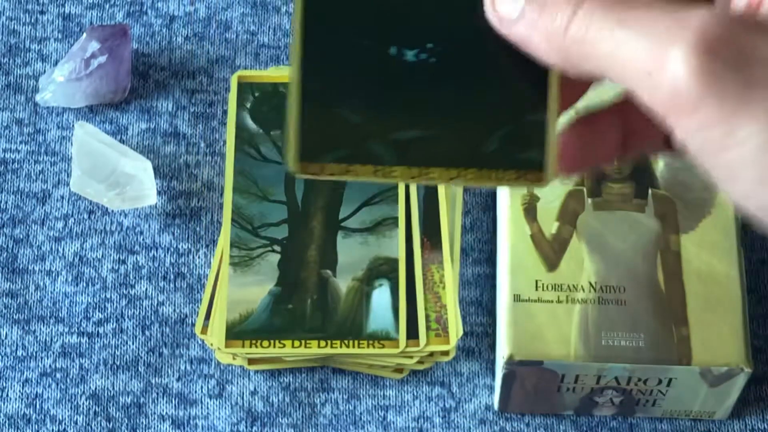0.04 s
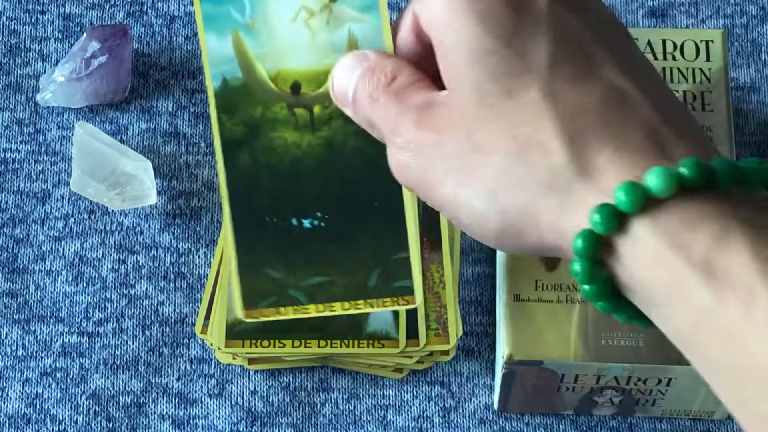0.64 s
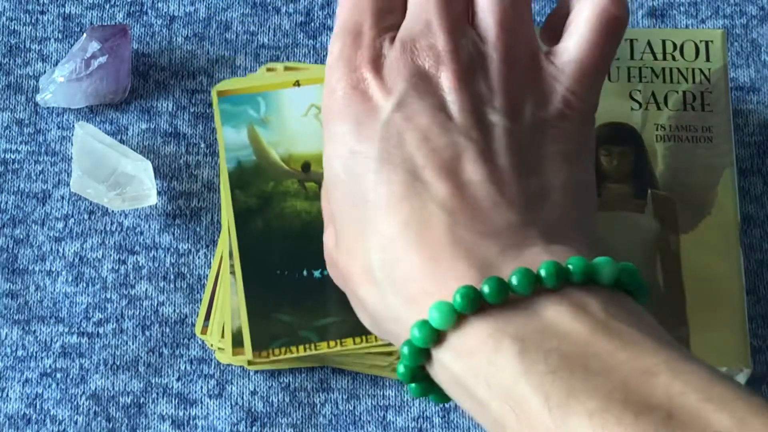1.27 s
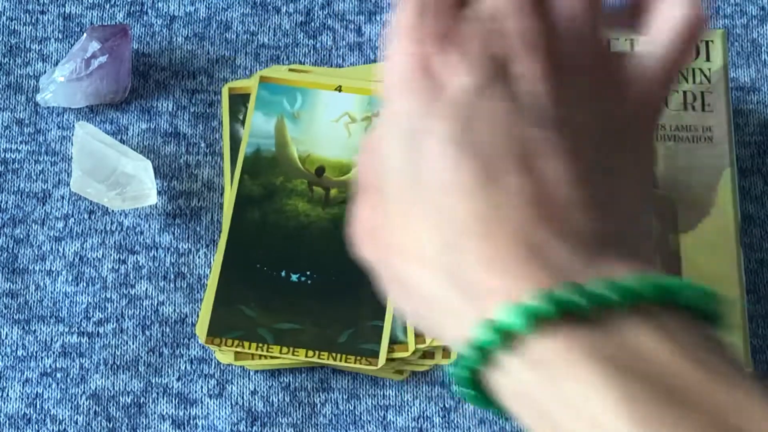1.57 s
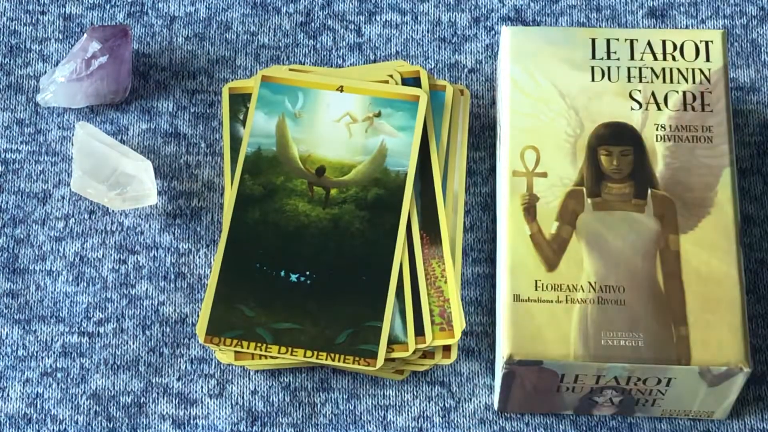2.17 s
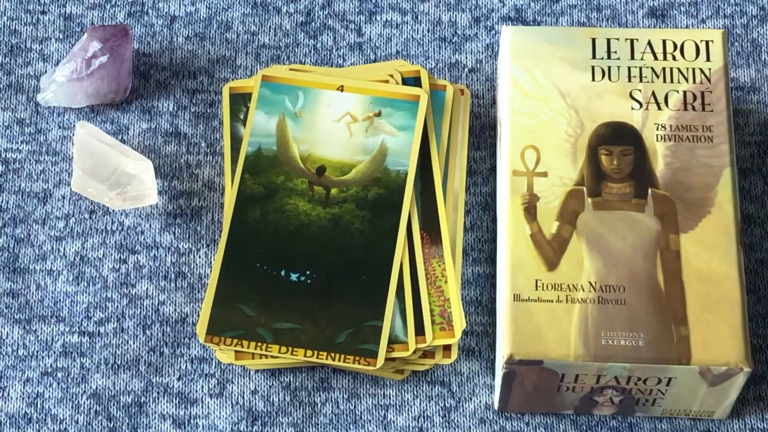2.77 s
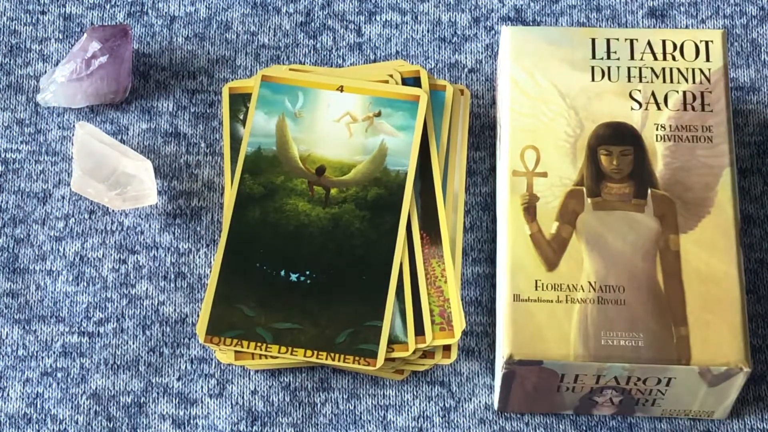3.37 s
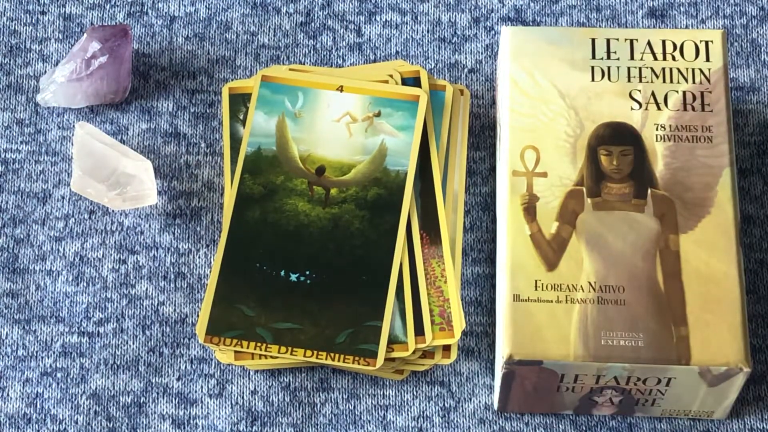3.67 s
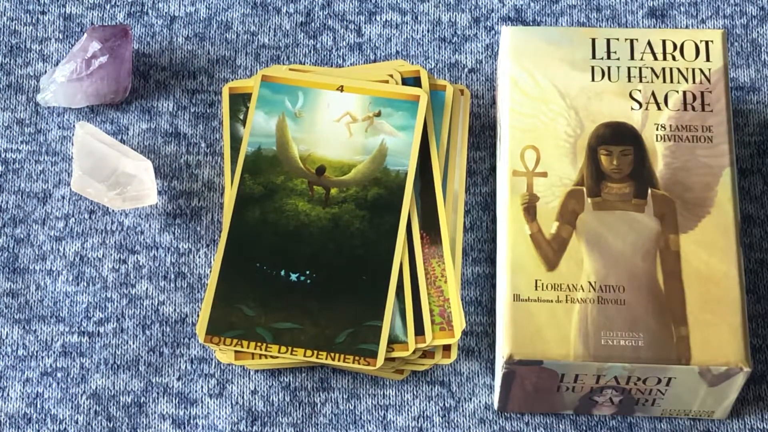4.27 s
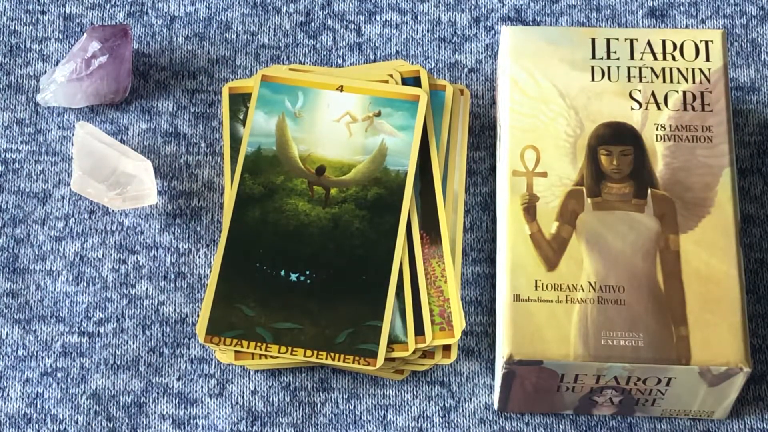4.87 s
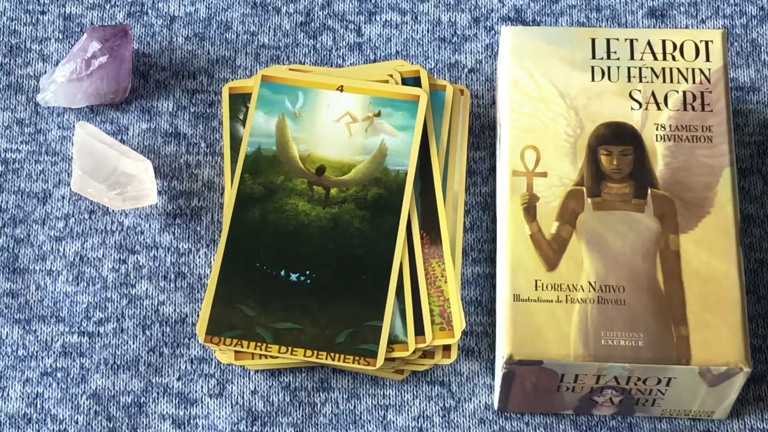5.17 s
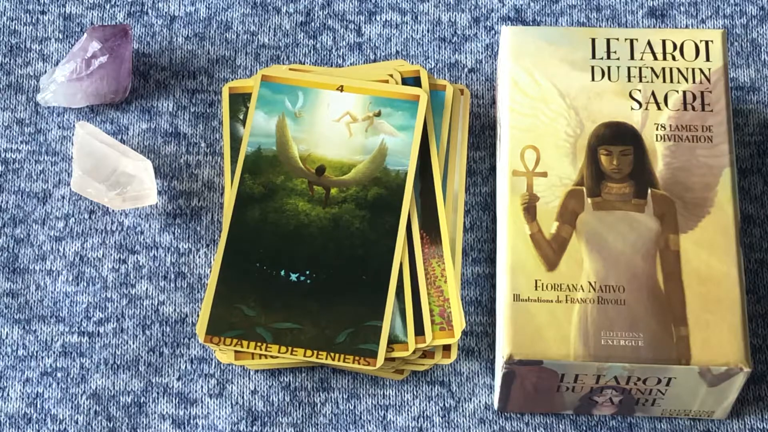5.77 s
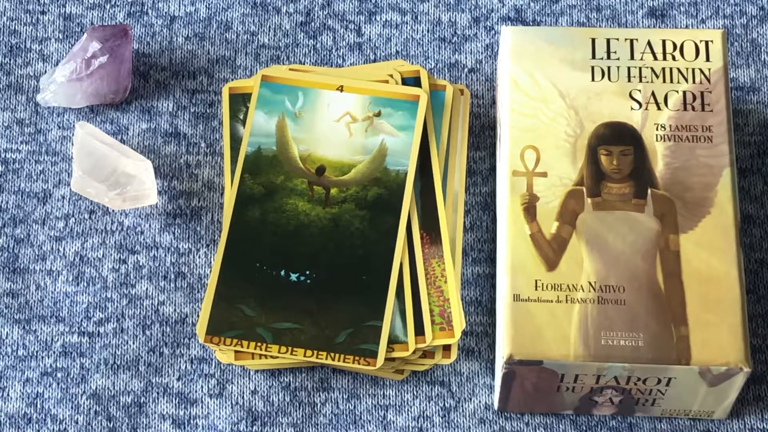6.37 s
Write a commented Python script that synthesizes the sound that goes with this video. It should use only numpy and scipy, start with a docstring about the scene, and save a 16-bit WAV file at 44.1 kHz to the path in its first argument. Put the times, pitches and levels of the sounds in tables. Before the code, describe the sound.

Stiff cards are handled close to the microphone in a small, quiet room, over faint steady air noise and a low hum. A light tick and a few soft papery rubs come in the first second. At about 1.3 seconds a card snaps crisply against the pile, with a brief room echo. From about 2.4 to 3.8 seconds there are only sparse, faint rubs and small ticks of fingers and card edges. A few little clicks at about 4.2 seconds lead into a second snap at 4.3 seconds, the loudest sound, sharp and with a fuller slap. Soft sliding hisses and light ticks follow until about 5.7 seconds, and one last faint rub comes at 6.5 seconds. A very faint low rumble swells now and then in the background.

```python
"""Stiff cards snap twice against a pile on a cloth-covered table, close to a phone in a small, quiet room.
A bent card slips off a finger and releases its elastic energy: the edge cracks, and the corner
and face twang in damped bending modes. Between the snaps, friction of fingers and cards makes
faint rubs and ticks. The walls reverberate briefly over still air, a low hum and a rumble."""
import sys
import numpy as np
from scipy import signal
from scipy.fft import rfft, irfft, next_fast_len
from scipy.io import wavfile

SR = 44100
rng = np.random.default_rng(int(sys.argv[2]) if len(sys.argv) > 2 else 0)


def generate_wav(signal):
    """Clip the signal to [-1, 1] and save it as 16-bit WAV at the path in sys.argv[1]."""
    frames = np.transpose(np.atleast_2d(signal))
    scaled = np.clip(frames, -1, 1) * 32767
    pcm = np.round(scaled).astype(np.int16)
    wavfile.write(sys.argv[1], SR, pcm)


N = 292436


def undb(db):
    """Decibels to amplitude gain."""
    return 10 ** (np.asarray(db) / 20)


def unit(x):
    """Normalisation to rms 1."""
    return x / np.sqrt(np.mean(x ** 2) + 1e-30)


def add(track, s, x):
    """Superposition: x joins the track from s seconds on."""
    i = max(int(s * SR), 0)
    track[i:i + len(x)] += x[:max(N - i, 0)]


def colour(x, points):
    """Spectral shaping by (Hz, dB) points, joined on a log-frequency axis."""
    hz, db = np.array(points).T
    bins_hz = np.fft.rfftfreq(len(x), 1 / SR)
    return irfft(rfft(x) * undb(np.interp(np.log(bins_hz + 1), np.log(hz), db)), len(x))


def resonate(x, hz, width_hz):
    """Resonance: two cascaded two-pole stages, each width_hz wide, give steep skirts."""
    hz = min(hz, SR * .4)
    b, a = signal.iirpeak(hz, hz / min(width_hz, SR / 4), fs=SR)
    return signal.lfilter(b, a, signal.lfilter(b, a, x))


def swell(t, peak_s, steepness):
    """Growth and exponential decay: an envelope that reaches 1 at peak_s."""
    u = t / peak_s
    return (u * np.exp(1 - u)) ** steepness


# The spectrum of the room's air. Each row: frequency in Hz, relative level in dB.
AIR_SPECTRUM = [(15, -51), (25, -21.5), (38, -16.5), (64, -6.5), (92, -5.5), (108, -6.5), (127, 0.5),
                (149, -4), (170, -9), (293, -8), (489, -16.5), (1040, -18), (1890, -27.5), (9320, -35),
                (16000, -42)]

def air(level_db=-63):
    """Stationary noise: the still room has a steady floor, strongest in the bass."""
    return undb(level_db) * unit(colour(rng.standard_normal(N), AIR_SPECTRUM))


# The bands of the hum. Each row: frequency in Hz, width of a resonator stage in Hz, level in dB.
HUM_BANDS = [(128, 8.3, -74.5), (170, 6.3, -74), (227, 14, -75)]

def hum(waver_db=.35):
    """Narrow-band noise: low resonances are heard as a hum whose level wavers slowly."""
    drift = np.interp(np.arange(N), np.linspace(0, N, 20), rng.standard_normal(20))
    bands = (undb(db) * unit(resonate(rng.standard_normal(N), hz, width)) for hz, width, db in HUM_BANDS)
    return sum(bands) * undb(waver_db * drift)


# The course of the rumble. Each row: time in seconds, level in dB.
RUMBLE_ENVELOPE = [(0, -74), (.7, -72), (.9, -60), (1.1, -72), (3.7, -81.5), (3.87, -59.5), (4.05, -75.5),
                   (4.8, -70.5), (5.099, -61.5), (5.6, -63), (6.1, -68)]
# Its spectrum. Each row: frequency in Hz, relative level in dB.
RUMBLE_SPECTRUM = [(60, -28.5), (125, 0.5), (180, -7), (280, -9.5), (450, -20.5), (1200, -43.5),
                   (4000, -67)]

def rumble():
    """Amplitude modulation: low noise in the room comes and goes."""
    level_db = np.interp(np.arange(N) / SR, *np.array(RUMBLE_ENVELOPE).T)
    return undb(level_db) * unit(colour(rng.standard_normal(N), RUMBLE_SPECTRUM))


# The room's echo. Each row: band centre in Hz, relative level in dB, time to fall 60 dB in seconds.
WALL_BANDS = [(100, -0.5, 0.62), (250, -11.5, .55), (450, -6, 0.55), (1010, -7, 0.69), (1755, -11.5, 0.78),
              (3980, -15.5, 0.69), (8000, -16.5, .56), (15000, -20, 0.29)]

def reverberate(x, gap_s=.0075, early_s=.018, early_width_s=.0025, early_db=-1.5):
    """Reverberation: after a gap the walls return x as early reflections and a tail that dulls."""
    t = np.arange(SR) / SR
    log_hz = np.log(np.fft.rfftfreq(SR, 1 / SR) + 1)
    log_centres = np.log([row[0] for row in WALL_BANDS])
    noise = rfft(rng.standard_normal(SR))
    response = np.zeros(SR)
    for band_weights, (_, db, t60) in zip(np.eye(len(WALL_BANDS)), WALL_BANDS):
        band = irfft(noise * np.interp(log_hz, log_centres, band_weights), SR)
        decay = np.exp(-np.log(1000) * t / t60) * (t > gap_s)
        response += undb(db) * band * decay / np.linalg.norm(decay)
    early_boost = 1 + undb(early_db) * np.exp(-.5 * ((t - early_s) / early_width_s) ** 2)
    return signal.oaconvolve(x, response * early_boost)[:N]


def diffuse_echo(flex_db=-.43, click_db=4, directions=6):
    """Incoherent addition: a card radiates differently to each wall, so the echoes blend evenly."""
    echo = np.zeros(N)
    for _ in range(directions):
        radiated = undb(flex_db) * flexes(phase_spread=.95) + undb(click_db) * (cracks() + ticks())
        echo += reverberate(radiated)
    return echo / np.sqrt(directions)


def grip(t, changes_per_s=260, spread_db=1.9):
    """Friction follows pressure: the gain varies as the grip tightens and lets go unevenly."""
    knots = np.arange(t[0], t[-1], 1 / changes_per_s)
    return undb(spread_db * np.interp(t, knots, rng.standard_normal(len(knots))))


def held_card(x, ring_ms=1.2, ring_db=-4):
    """Forced vibration: in every grip the card adds its own short, papery ring to x."""
    t = np.arange(SR // 100) / SR
    ring = rng.standard_normal(len(t)) * np.exp(-1000 * t / ring_ms)
    return x + undb(ring_db) * signal.oaconvolve(x, ring / np.linalg.norm(ring))[:len(x)]


# The hiss of sliding paper. Each row: frequency in Hz, relative level in dB.
SLIDE_SPECTRUM = [(100, -5), (500, 0.5), (1500, 6), (3500, -1), (6500, -2), (8700, -0.5), (12000, -6.5),
                  (15500, -12)]
# Soft rubs and, at 4.324 s, a faint, brief high hiss just before the loud snap. Each row: time of the
# peak in seconds, length in seconds, level in dB, resonance in Hz, hiss in dB relative to the resonance.
RUBS_AND_HISS = [(0.115, 0.027, -55, 3340, -1), (0.121, 0.024, -58, 1100, -18), (.427, .02, -59, 3620, 15),
                 (0.471, .024, -65, 8150, -2), (0.608, .016, -63, 6130, 21), (1.007, .085, -71.5, 1890, -8),
                 (1.084, .044, -58.5, 2850, -2), (1.271, .016, -46.5, 4220, 3),
                 (1.294, 0.03, -46, 137, -27), (2.425, .042, -57.5, 664, -21), (2.435, .055, -63, 2960, -8),
                 (2.745, .032, -63, 2120, -10), (2.988, .055, -60.5, 1900, -9),
                 (3.148, .028, -52.5, 1880, -9.5), (3.344, .018, -67, 4500, 3),
                 (3.771, .033, -67, 3780, -0.5), (4.324, 0.03, -68, 5500, 6),
                 (4.335, .004, -41.5, 2200, -1.5), (4.633, .042, -54.5, 4465, 9),
                 (4.703, .05, -55.5, 5458, 3), (4.777, .015, -63.5, 4000, -5),
                 (5.152, .06, -65.5, 7500, 4.5), (5.385, 0.065, -64.5, 1907, -6),
                 (5.507, 0.013, -54.5, 3630, 0), (5.647, .016, -52.5, 3900, -2),
                 (6.522, .037, -60, 3400, -1)]

def rubs(slips_per_s=4500, scatter_db=1.5, smooth_db=-2, rise_share=.49, relative_width=.81):
    """Stick-slip friction: in a rub, fibres catch and let go in dense, uneven grains over a smooth hiss."""
    out = np.zeros(N)
    for peak_s, length_s, db, hz, hiss_db in RUBS_AND_HISS:
        rise_s, fall_s = rise_share * length_s, (1 - rise_share) * length_s
        t = np.arange(next_fast_len(int(4 * length_s * SR))) / SR - 4 * rise_s
        slipping = rng.random((2, len(t))) < slips_per_s / SR
        slip, size, smooth = rng.standard_normal((3, 2, len(t)))
        push, scrape = unit(slipping * slip * undb(scatter_db * size)) + undb(smooth_db) * smooth
        body = unit(resonate(push, hz, relative_width * hz))
        hiss = undb(hiss_db) * unit(colour(scrape, SLIDE_SPECTRUM))
        envelope = np.exp(-.5 * (t / np.where(t < 0, rise_s, fall_s)) ** 2)
        burst = undb(db) * unit(held_card(body + hiss) * grip(t)) * envelope
        add(out, peak_s + t[0], burst[peak_s + t >= 0])
    return out


# The crack of a paper edge. Each row: frequency in Hz, relative level in dB.
EDGE_SPECTRUM = [(100, -20.5), (500, -7), (1500, 4.5), (3000, 2), (6500, -5.5), (8500, -1.5), (12000, -1.5),
                 (15500, -8)]

def click(length_ms, hz, crack_db):
    """Impulsive excitation: an edge scrapes free with a bright crack and a broad paper resonance."""
    t = np.arange(SR // 20) / SR
    envelope = swell(t, length_ms / 1000 / 3, steepness=.8)
    push, scrape = rng.standard_normal((2, len(t)))
    body = unit(resonate(push * envelope, hz, width_hz=hz))
    crack = undb(crack_db) * unit(colour(scrape, EDGE_SPECTRUM) * envelope)
    return unit(body + crack) * np.sqrt(np.mean(envelope ** 2))


# Ticks of card edges and nails. Each row: start in seconds, level in dB, resonance in Hz,
# crack in dB relative to the resonance.
EDGE_TICKS = [(.844, -55.5, 1590, -15), (1.2807, -26.5, 5770, -7), (2.419, -51, 2500, -27),
              (3.012, -51, 2300, -15), (3.1186, -53, 1910, -17), (3.187, -54.5, 1630, -18),
              (4.2, -50, 1250, 20), (4.2196, -56, 1200, 18), (4.2623, -51.5, 9010, 0),
              (4.613, -46, 1268, -3), (4.794, -50.5, 3200, -5.5), (4.916, -49.5, 1710, 2),
              (4.96, -55, 2850, -13), (5.305, -56.5, 2165, -7), (5.349, -45.5, 1530, -3.5),
              (5.411, -52, 1720, -17), (5.6492, -44.5, 3865, -5)]

def ticks(base_length_ms=1.8, dull_db_per_doubling=18):
    """Contact time and bandwidth: a softer contact lasts longer and sounds duller."""
    out = np.zeros(N)
    for s, db, hz, crack_db in EDGE_TICKS:
        length_ms = base_length_ms * 2 ** (-crack_db / dull_db_per_doubling)
        add(out, s, undb(db) * click(length_ms, hz, crack_db))
    return out


# The modes of the bent corner. Each row: multiple of the corner's pitch, relative level in dB.
CORNER_MODES = [(1.0, -0.5), (1.5, -14.5)]
# The modes of the face. Each row: multiple of the face's pitch, relative level in dB.
FACE_MODES = [(.28, -24), (1.0, 1.5), (2.05, -2), (2.84, 3), (4.55, -2.5)]
# A bent card springs free or lands. Each row: time in seconds, face pitch in Hz, face level in dB,
# corner pitch in Hz, corner level in dB, level of the edge's crack in dB.
CARD_SNAPS = [(.1285, 482, -48.5, 3000, -43, -55.5), (1.2731, 538, -34, 3900, -28, -61),
              (1.2752, 390, -30.5, 3845, -13.5, -27.5), (1.2795, 438, -33, 3850, -36, -41),
              (2.3988, 570, -58, 2900, -39.5, -58), (3.7761, 450, -52, 1900, -56.5, -50),
              (4.2874, 449.2, -61, 3120, -31.5, -35.5), (4.3365, 498.8, -16.5, 1946, -4, -12.5)]

def flexes(phase_spread=0, peak_lag_1khz_ms=2.55, swell_1khz_ms=1.7):
    """Dispersion of bending waves: low modes arrive later and last longer as the pile damps them."""
    out, t = np.zeros(N), np.arange(SR // 20) / SR
    for s, face_hz, face_db, corner_hz, corner_db, _ in CARD_SNAPS:
        modes = [(corner_hz * multiple, corner_db + db) for multiple, db in CORNER_MODES]
        modes += [(face_hz * multiple, face_db + db) for multiple, db in FACE_MODES]
        for hz, db in modes:
            slowness = np.sqrt(1000 / hz)
            peak_s = s + peak_lag_1khz_ms * slowness / 1000
            swell_s = swell_1khz_ms * slowness / 1000
            phase_cycles = phase_spread * rng.random()  # off to the side, modes arrive out of step
            swing = np.sin(2 * np.pi * (hz * t + phase_cycles))
            add(out, peak_s - swell_s, undb(db) * swell(t, swell_s, steepness=3.6) * swing)
    # Slow swings only move air round the card and radiate little.
    return signal.sosfilt(signal.butter(4, 70, "high", fs=SR, output="sos"), out)


def cracks(lead_ms=.4, corner_overtone=2.2, hard_db=-13.5, tip_lag_ms=1.6, tip_db=-9):
    """Sudden release of strain: the edge cracks just before each swing, then its tip spits thinly."""
    out = np.zeros(N)
    for s, _, _, corner_hz, _, db in CARD_SNAPS:
        bright_db = 5 + .42 * (db - hard_db)  # a harder crack is brighter
        edge = click(length_ms=1.4, hz=corner_overtone * corner_hz, crack_db=bright_db)
        tip = click(length_ms=1.3, hz=14000, crack_db=-bright_db)
        add(out, s - lead_ms / 1000, undb(db) * edge)
        add(out, s + tip_lag_ms / 1000, undb(db + bright_db + tip_db) * tip)
    return out


def scene():
    """Superposition: the background, the echo from the walls and the direct sound of the cards add."""
    rustle = rubs()
    echo = diffuse_echo() + reverberate(rustle)
    direct = rustle + flexes() + cracks() + ticks()
    return (air() + hum() + rumble() + echo + direct)[None]


def record(dry):
    """Band limiting: the phone cuts the treble above 16.1 kHz."""
    return signal.sosfilt(signal.ellip(8, .2, 70, 16100, fs=SR, output="sos"), dry)


dry = scene()
out = record(dry)
generate_wav(out)
```